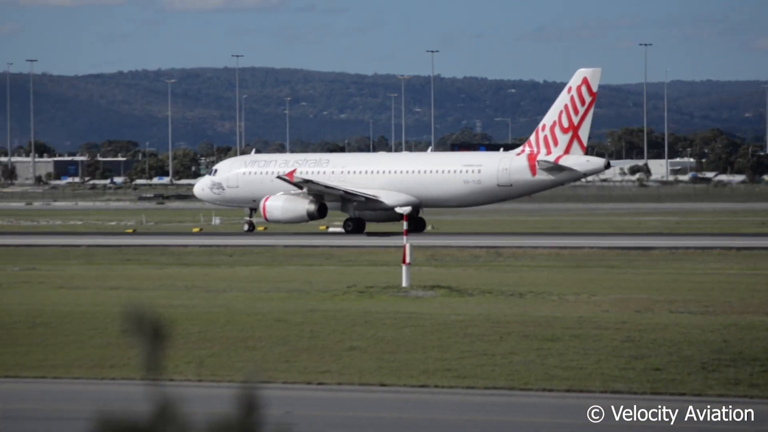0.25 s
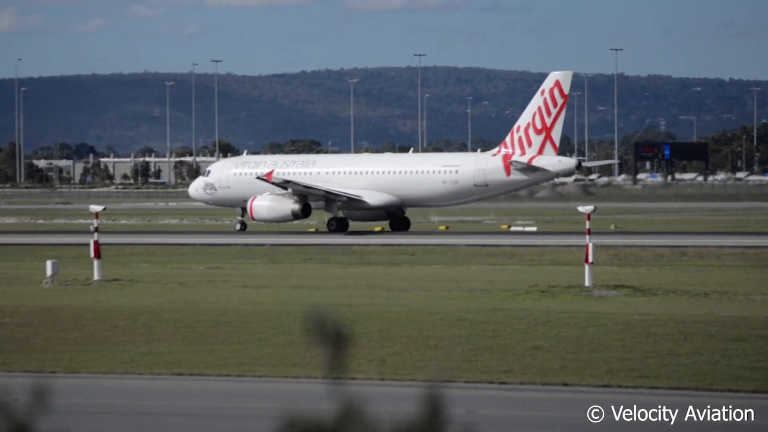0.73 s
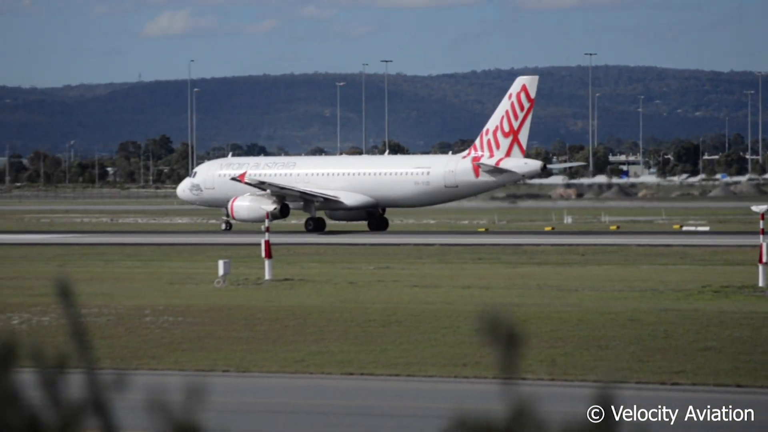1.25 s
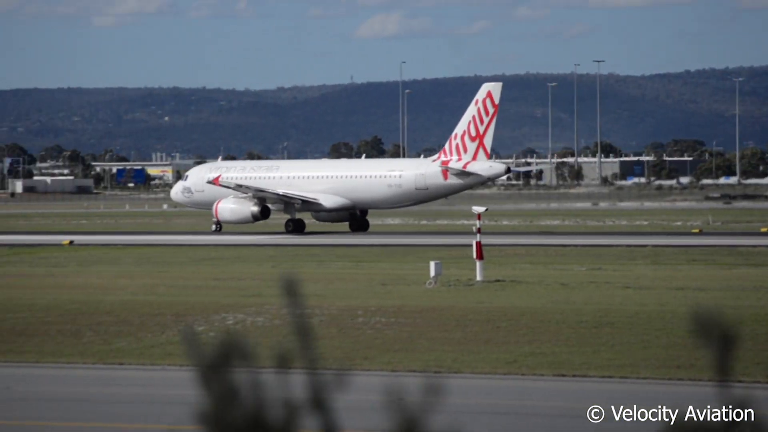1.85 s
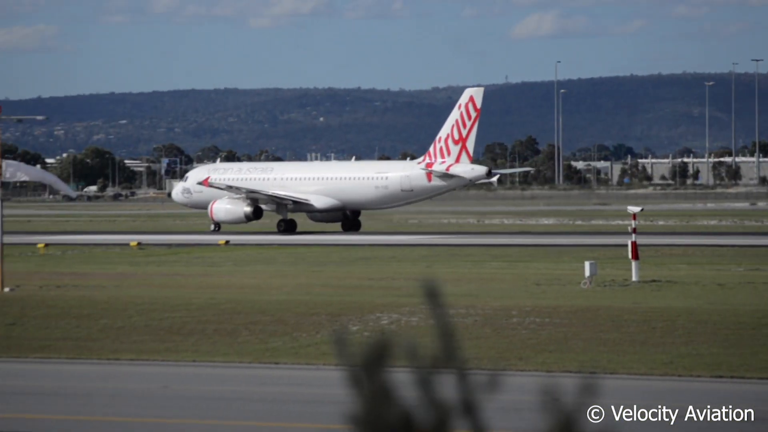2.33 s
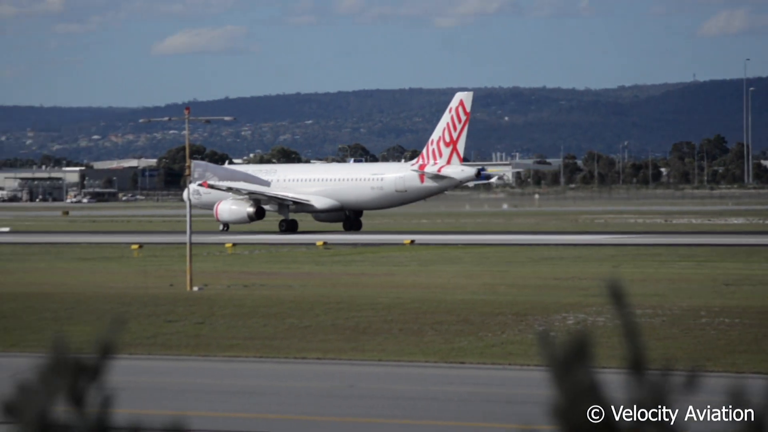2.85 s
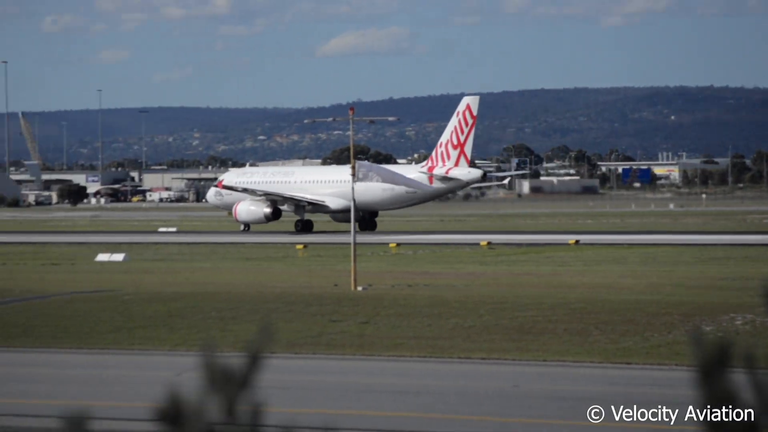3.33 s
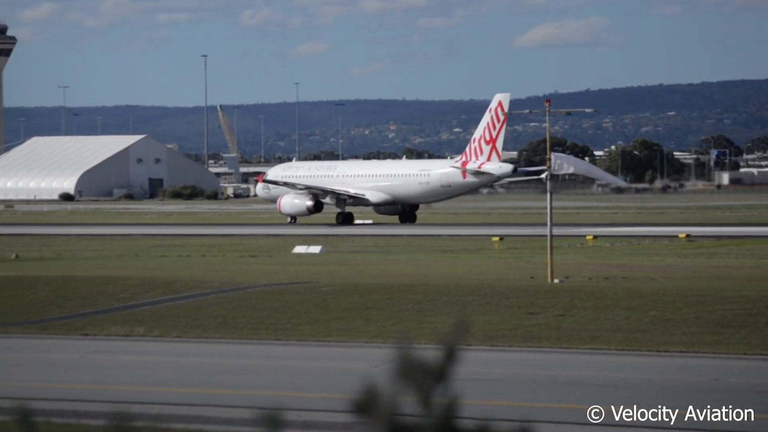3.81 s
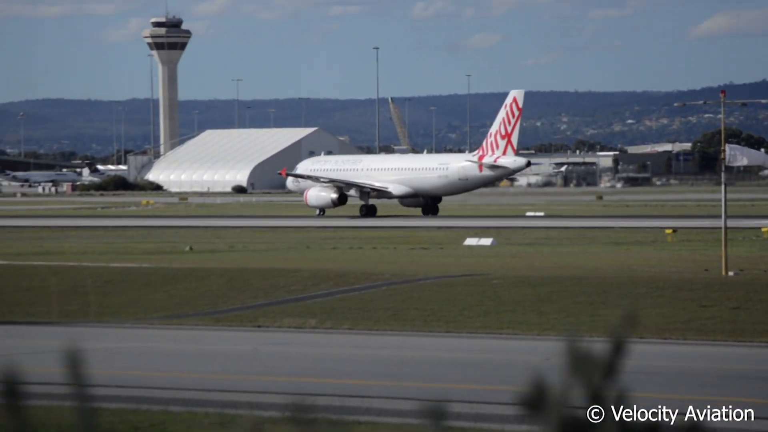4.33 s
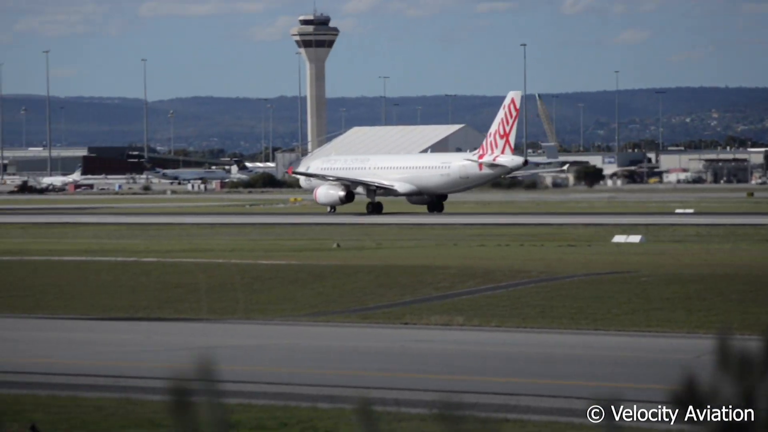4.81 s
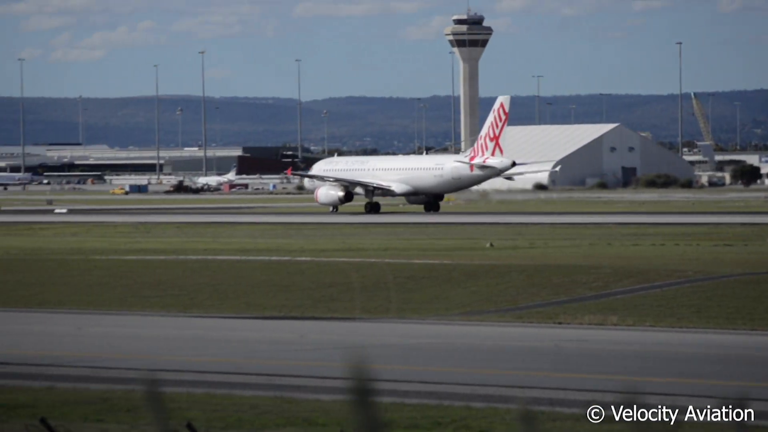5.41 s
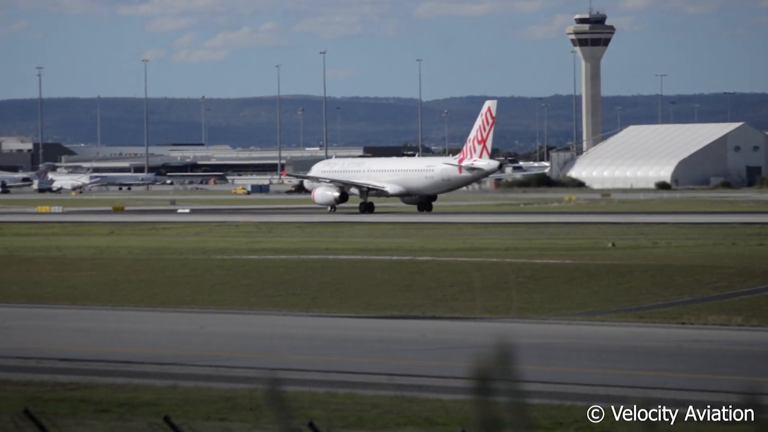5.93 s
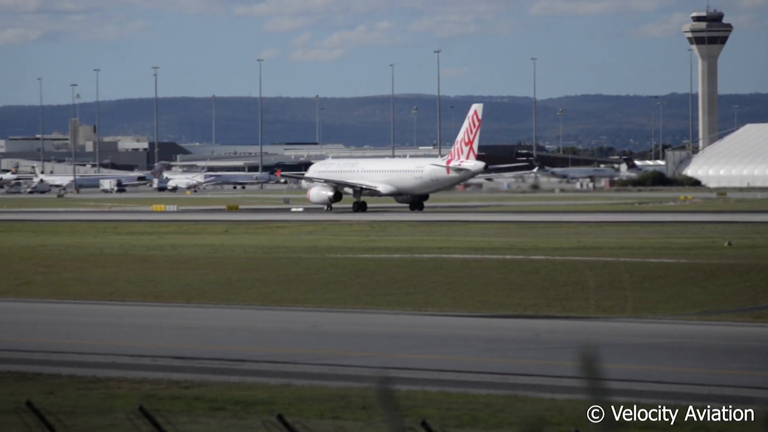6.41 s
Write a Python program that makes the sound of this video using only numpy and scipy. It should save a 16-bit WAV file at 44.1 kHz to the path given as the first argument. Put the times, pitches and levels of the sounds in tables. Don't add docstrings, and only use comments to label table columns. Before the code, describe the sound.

Distant jet engines rumble heavily across an open airfield, surging and sinking in the air, with the fan hiss slowly dulling as the plane recedes.

```python
import sys
import numpy as np
from scipy import signal
from scipy.fft import rfft, irfft, next_fast_len
from scipy.io import wavfile
from scipy.ndimage import uniform_filter1d, minimum_filter1d, map_coordinates

SR = 44100
rng = np.random.default_rng(int(sys.argv[2]) if len(sys.argv) > 2 else 0)


def invert_db(x):
    u = np.asarray(x, float) / 20
    return 10 ** u


def unload_audio(sound):
    columns = np.transpose(np.atleast_2d(sound))
    steps = np.round(np.clip(columns, -1, 1) * 32767)
    wavfile.write(sys.argv[1], SR, steps.astype(np.int16))


N = 293706


# pitch_hz, density_db (dB per Hz)
THROB_COLOUR = [(15, -46), (25, -25), (32, -20), (40, -10), (50, 0.5), (62, -2), (85, -31)]
RUMBLE_COLOUR = [(30, -57.5), (50, -26), (65, -8.5), (90, -0.5), (120, 1.5), (165, -2), (210, -10.5),
                 (300, -40), (400, -66.5)]
GROWL_COLOUR = [(120, -49), (170, -6), (215, -1), (260, -7), (320, -11.5), (400, -24), (520, -46.5)]
# centre_s, level_db (over the steady rumble), length_s
LARGE_EDDIES = [(.35, 2, 0.093), (.59, 4.5, 0.034), (.91, 4.5, 0.063), (1.16, 5, 0.052), (1.3, 7, 0.026),
                (1.9, -4, 0.17), (2.3, -1, 0.18), (2.86, 7.5, 0.055), (3.04, -1, 0.038), (3.2, 2, .08),
                (3.35, 2, 0.061), (3.62, 5, 0.015), (3.84, 3, 0.034), (3.95, 4, 0.014), (4.5, 2, 0.21),
                (4.72, 4, 0.041), (4.93, 4, .05), (5.06, 1.5, 0.035), (5.12, -2.5, .04), (5.22, 1, 0.039),
                (5.35, 4, 0.09), (5.82, 2, 0.045), (6.12, 3.2, 0.068), (6.36, 2, 0.056), (6.44, -5, 0.027),
                (6.53, 3, 0.04)]
# centre_s, level_db (over the steady growl), length_s
SMALL_EDDIES = [(.05, 4, .1), (.31, 3.5, 0.045), (.5, 3.5, 0.073), (.78, 2.5, 0.063), (1.3, 3, .12),
                (1.43, 3, 0.072), (2.12, -2.5, .08), (2.55, 1, .08), (2.8, 2.5, 0.16), (3.3, -1.5, 0.14),
                (3.84, 4, .05), (4.04, 3.5, .04), (4.21, -3.5, 0.046), (4.47, -1, .05), (5.17, 7, 0.036),
                (5.48, 3, .09), (5.78, 3, 0.043), (5.98, 6.5, 0.094), (6.29, 1.5, .04)]
# steady_db, carry_share, echo_share, clearness_share, loss_db_per_s
RUMBLE_REACH = (-22, 0.05, 0.09, 0.43, 0.13)
GROWL_REACH = (-29, 0.7, 0.7, 0.17, 0.5)


def plumes():
    rumble_db = arriving(RUMBLE_REACH) + swells(LARGE_EDDIES) + 0.24 * wobble(15)
    growl_db = arriving(GROWL_REACH) + swells(SMALL_EDDIES) + 0.34 * wobble(11)
    rumble = evened(rush(RUMBLE_COLOUR, patchy_db=-1.6), span_s=0.07, share=0.44)
    growl = evened(rush(GROWL_COLOUR, patchy_db=-0.24), span_s=0.17, share=0.54)
    throb = invert_db(-43.5) * rush(THROB_COLOUR, patchy_db=5.0)
    return invert_db(rumble_db) * rumble + invert_db(growl_db - 1.5) * growl + throb


# pitch_hz, density_db (dB per Hz)
LOW_ROAR_COLOUR = [(250, -41.5), (380, 3), (480, 1.5), (620, 0), (800, -4), (1000, -14.5), (1400, -47.5)]
HIGH_ROAR_COLOUR = [(550, -40), (800, -2.5), (1050, 0.5), (1300, -3), (1700, -5), (2100, -13.5),
                    (2800, -45.5)]
# centre_s, low_roar_db, high_roar_db, length_s
ROAR_FLARES = [(.09, 1, -.6, .06), (.28, -1, 1, .06), (.43, 1.5, 2, .05), (.6, 2.5, 0, .08),
               (1.9, 2.2, -1.2, .12), (2.15, -0.5, -1, .08), (3.47, -1.5, 0.5, 0.045), (4.3, 1, 0.5, .1),
               (5.3, -.6, 1.5, .1), (5.55, -2, -.4, .06), (5.82, 3.5, -1, 0.094), (6.2, 1.5, 0.5, .08),
               (6.42, 2, -.6, 0.11)]
# steady_db, carry_share, echo_share, clearness_share, loss_db_per_s
LOW_ROAR_REACH = (-41, 1.06, 0.3, 0.13, 0.11)
HIGH_ROAR_REACH = (-45.5, 1.14, 0.05, 0.34, -0.24)


def cores():
    low_db = arriving(LOW_ROAR_REACH) + swells(ROAR_FLARES)
    high_db = arriving(HIGH_ROAR_REACH) + swells(ROAR_FLARES, column=2)
    low_roar = invert_db(low_db) * rush(LOW_ROAR_COLOUR, patchy_db=1.5)
    high_roar = invert_db(high_db) * rush(HIGH_ROAR_COLOUR, patchy_db=1.0)
    return low_roar + high_roar


# pitch_hz, density_db (dB per Hz)
WAKE_COLOUR = [(1200, -38.5), (1700, -2.5), (2000, -2.5), (2450, -1.5), (2750, -12.5), (3300, -43.5)]
UPPER_WAKE_COLOUR = [(2100, -36), (2550, -2.5), (2800, -1.5), (3100, -3), (3400, -7.5), (3800, -15),
                     (4200, -29), (5000, -52.5)]
EDGE_COLOUR = [(3200, -33), (3900, 1), (4300, -1), (5000, -4), (6000, -12.5), (7500, -18), (10000, -45)]
AIRY_COLOUR = [(4300, -25), (5200, -2), (6000, 0.5), (7000, -5), (8500, -16), (10000, -35.5)]
# centre_s, upper_hiss_db, blade_tone_db, length_s
DUCT_GLINTS = [(.04, -1.5, 7, 0.056), (.28, 5.5, 10.5, 0.04), (.34, 3.5, 4, .08), (.62, 2, 10, .08),
               (.72, 1.5, 5, .04), (.78, 1.5, 7, .04), (.87, 2.2, 7, .06), (1.15, -1, 4.5, .06),
               (1.38, -1.5, 3, .06), (2.72, 2, -1, .1), (5.05, 2.5, -1.5, .12)]
# steady_db, carry_share, echo_share, clearness_share, loss_db_per_s
WAKE_REACH = (-49, 0.94, 0.23, 1.5, 0.46)
UPPER_WAKE_REACH = (-55, 0.92, 0.17, 1.1, .5)
EDGE_REACH = (-71, 0.37, 0.07, 0.4, 0.45)


def fans():
    glint_db = swells(DUCT_GLINTS)
    wake_db = arriving(WAKE_REACH) + 0.47 * glint_db
    upper_db = arriving(UPPER_WAKE_REACH) + glint_db
    edge_db = arriving(EDGE_REACH) + 0.4 * glint_db
    wakes = invert_db(wake_db) * rush(WAKE_COLOUR, patchy_db=1.0)
    upper_wakes = invert_db(upper_db) * rush(UPPER_WAKE_COLOUR, patchy_db=0.7)
    edge = invert_db(edge_db + 1.0) * rush(EDGE_COLOUR, patchy_db=1.2)
    airy_db = -77 - 7.5 * np.abs(np.arange(N) / SR - 0.35)
    airy = invert_db(airy_db) * rush(AIRY_COLOUR, patchy_db=-1.2)
    return wakes + upper_wakes + edge + airy


def blade_tone():
    t = np.arange(N) / SR
    pitch_hz = 3254 - 9 * t
    level_db = -62 - 4.5 * t + swells(DUCT_GLINTS, column=2)
    scatter = 1 + 0.35 * (wobble(45) + 1j * wobble(45))
    tone = np.exp(2j * np.pi * np.cumsum(pitch_hz) / SR)
    return invert_db(level_db) * np.real(scatter * tone)


# time_s, roar_carry_db, low_middle_ground_echo_db, treble_clearness_db
AIR_PATH = [(0, -42, 14.5, 0), (.3, -41.5, 11, -0.5), (.57, -38, 8, -2), (.95, -42.5, 10, -0.5),
            (1.4, -44, 14, -0.5), (1.9, -46.5, 16, -1), (2.2, -45.5, 8, 2.5), (2.5, -43, 11.5, 0),
            (2.95, -42.5, 8, 0.5), (3.5, -47, 8, 0.5), (3.85, -44.5, 7, 0.5), (4.3, -44, 3, 0.5),
            (4.85, -44.5, 6.5, 0.5), (5.3, -42.5, 7.5, -1), (5.65, -46.5, 14.5, -1), (5.98, -43, 11.5, 0.5),
            (6.25, -38.5, 9, -4), (6.66, -45.5, 11.5, 1)]


def arriving(reach):
    steady_db, *shares, loss_db_per_s = reach
    path_curves = curves(AIR_PATH, smooth_s=0.12)
    path_db = sum(share * (curve - curve.mean()) for share, curve in zip(shares, path_curves))
    return steady_db + path_db - loss_db_per_s * np.arange(N) / SR


def rush(colour, patchy_db):
    spectrum = signal.stft(rng.standard_normal(N + 8192), nperseg=1024)[2]
    patches = uniform_filter1d(rng.standard_normal(spectrum.shape), size=7, axis=0)
    patches = unit(uniform_filter1d(patches, size=12, axis=1))
    noise = signal.istft(spectrum * invert_db(patchy_db * patches), nperseg=1024)[1]
    size = next_fast_len(len(noise))
    hz, db = np.transpose(colour)
    log_hz = np.log(np.fft.rfftfreq(size, 1 / SR) + 1)
    gain = invert_db(np.interp(log_hz, np.log(hz), db, left=-120, right=-120))
    coloured = irfft(rfft(noise, size) * gain, size)
    return unit(coloured[4096:][:N])


def swells(rows, column=1):
    rows = np.array(rows)
    t = np.arange(0, N + 64, 64) / SR
    length_s = np.abs(rows[:, -1]) + 0.005
    bells = np.exp(-((t[:, None] - rows[:, 0]) / length_s) ** 2)
    return np.interp(np.arange(N) / SR, t, bells @ rows[:, column])


def evened(x, span_s, share):
    power = np.abs(uniform_filter1d(x ** 2, int(span_s * SR) + 1)) + 1e-6
    return unit(x / power ** (share / 2))


def wobble(rate):
    knots = rng.standard_normal(int(N * rate / SR) + 4)
    return map_coordinates(knots, [np.arange(N) * rate / SR])


def curves(rows, smooth_s=0.042):
    s, *columns = np.transpose(rows)
    t = np.arange(N) / SR
    span = int(smooth_s * SR) + 1
    return [uniform_filter1d(np.interp(t, s, column), span) for column in columns]


def unit(x):
    return x / np.sqrt(np.mean(x ** 2) + 1e-20)


def scene():
    return (plumes() + cores() + fans() + blade_tone())[None]


# pitch_hz, density_db (dB per Hz)
MICROPHONE_COLOUR = [(300, -22), (3000, 1), (8000, -2), (12000, -2), (15000, -2.5), (20000, 2.5)]


def microphone_hiss():
    return invert_db(-67.5) * rush(MICROPHONE_COLOUR, patchy_db=-0.5)


def band_limit(x):
    return signal.sosfilt(signal.butter(12, 15710, fs=SR, output="sos"), x)


def record(dry):
    low_cut = signal.butter(2, 28, "high", fs=SR, output="sos")
    heard = signal.sosfilt(low_cut, dry)
    needed = np.clip(0.4 / (np.abs(heard) + 1e-9), 0, 1)
    gain = uniform_filter1d(minimum_filter1d(needed, size=900), size=900)
    opening = np.clip(np.arange(N) / (0.002 * SR), 0, 1)
    mix = (heard * gain + microphone_hiss()) * opening
    return band_limit(mix)


dry = scene()
out = record(dry)
unload_audio(out)
```